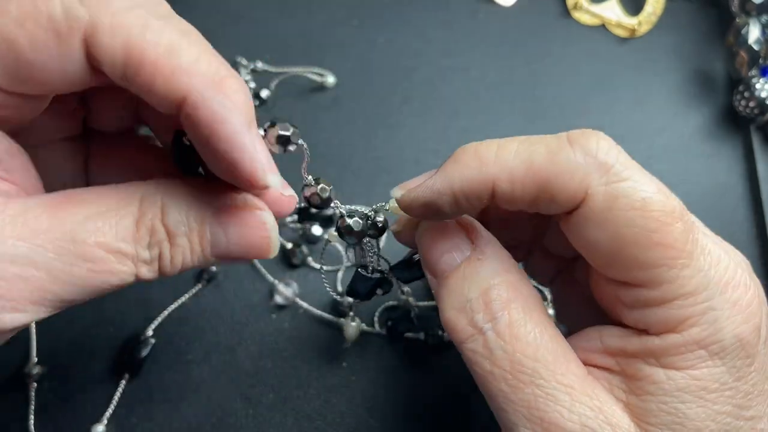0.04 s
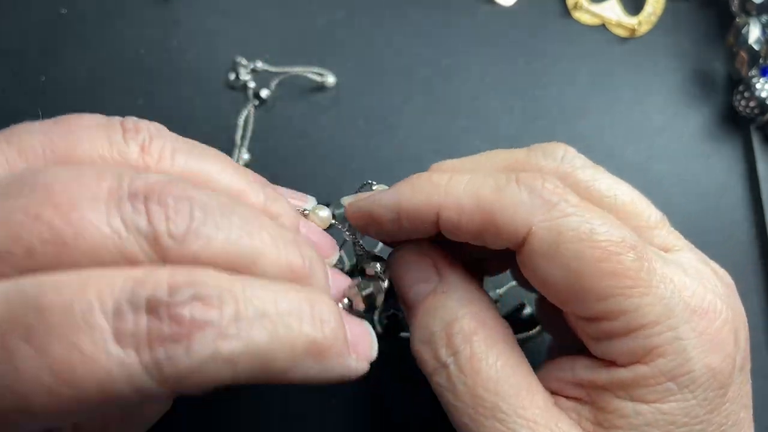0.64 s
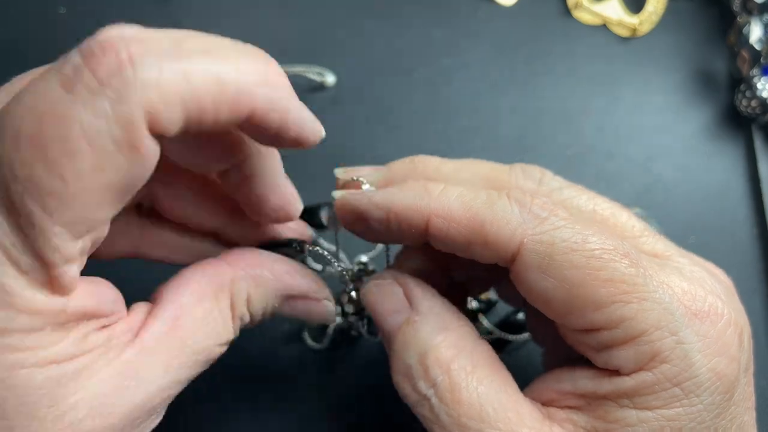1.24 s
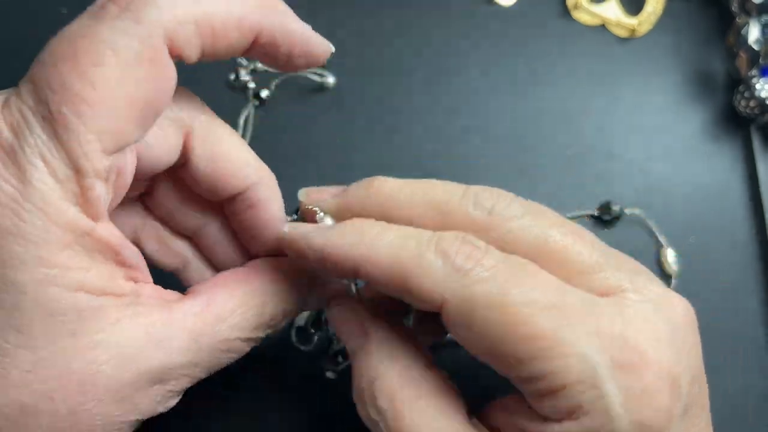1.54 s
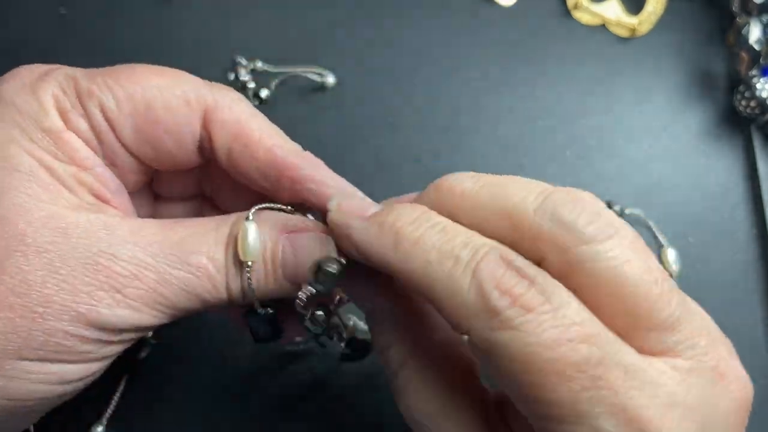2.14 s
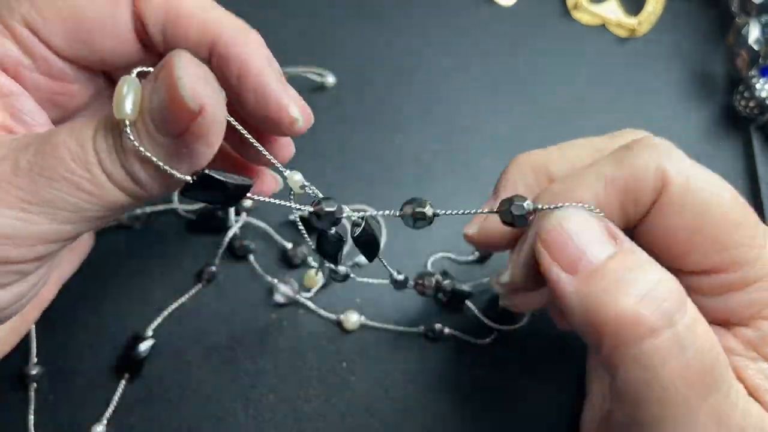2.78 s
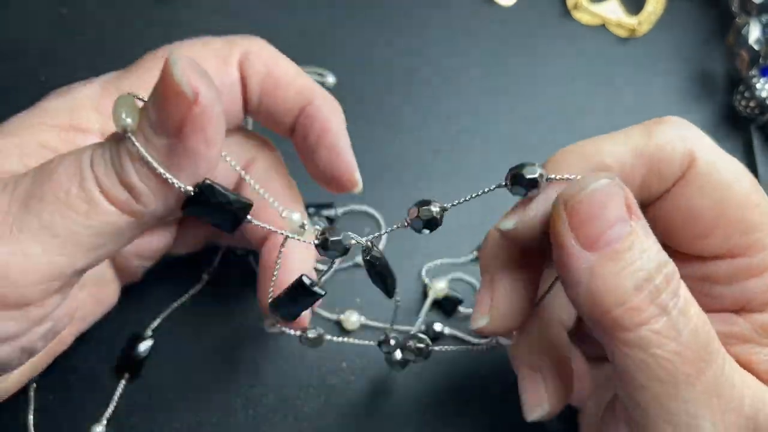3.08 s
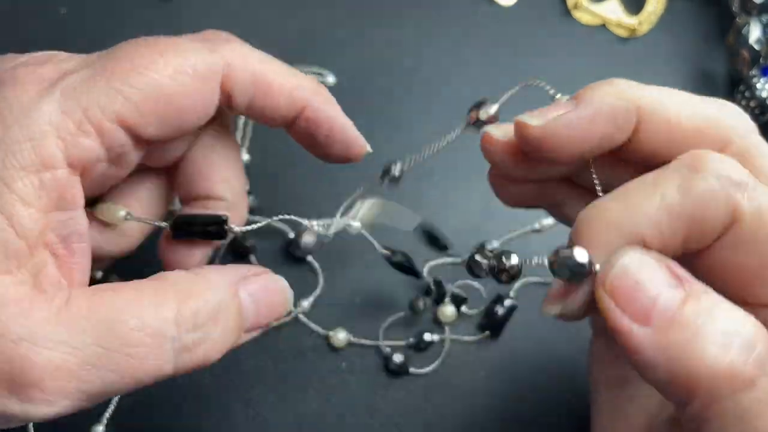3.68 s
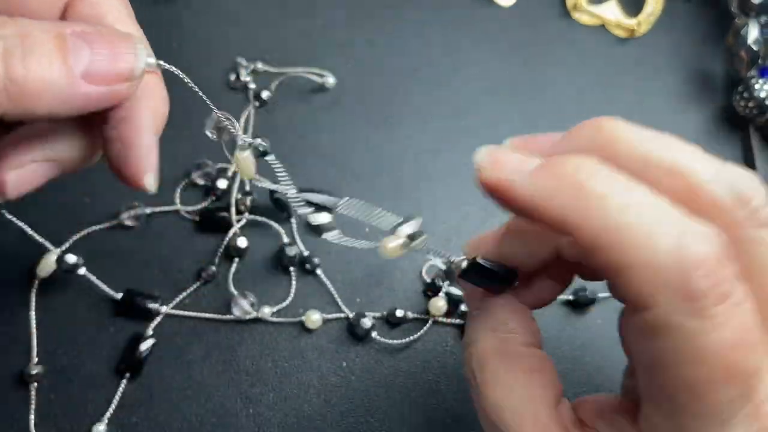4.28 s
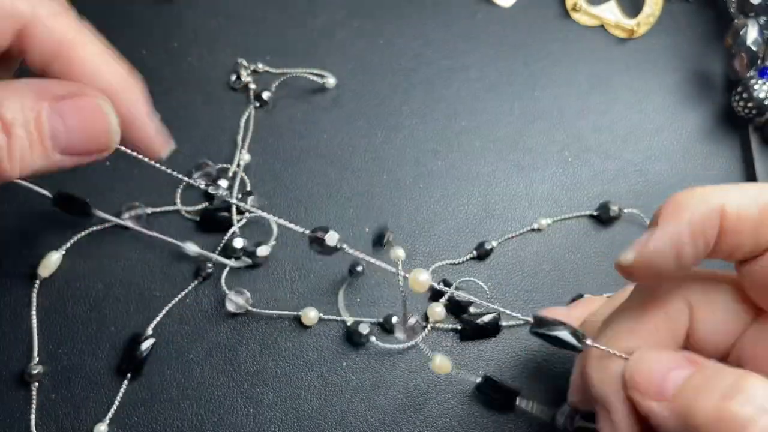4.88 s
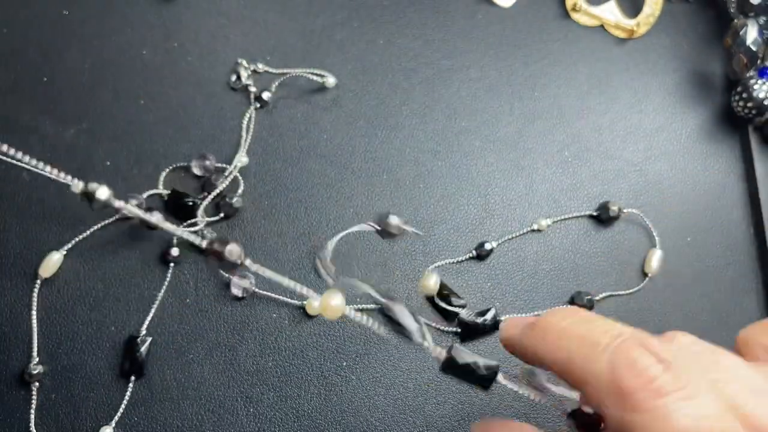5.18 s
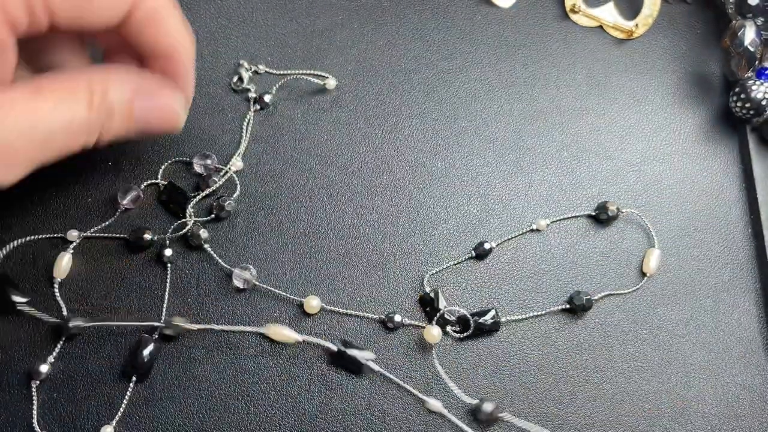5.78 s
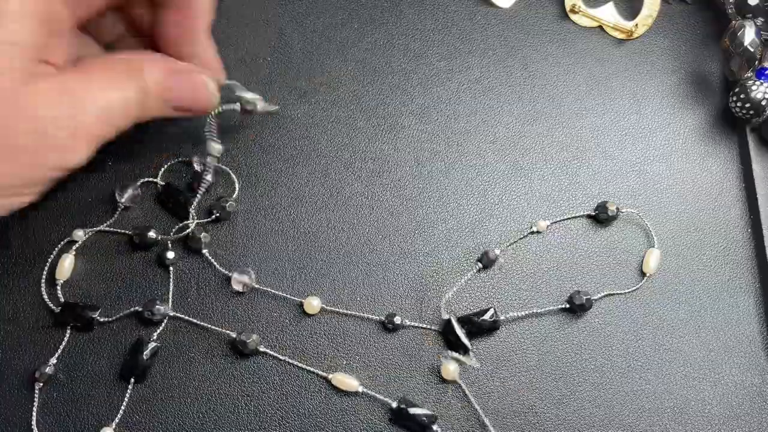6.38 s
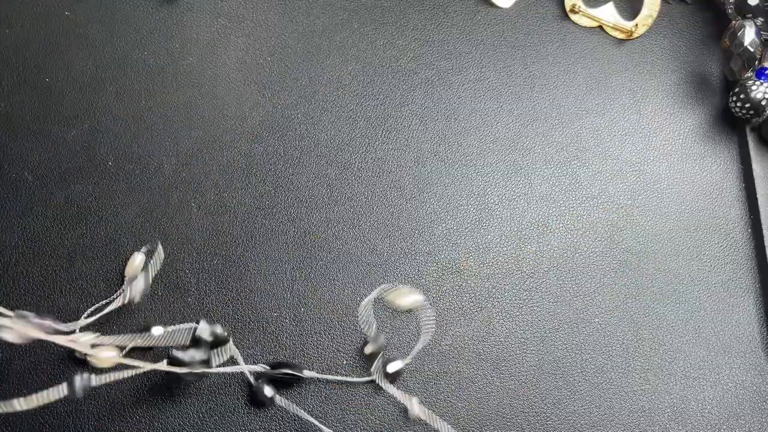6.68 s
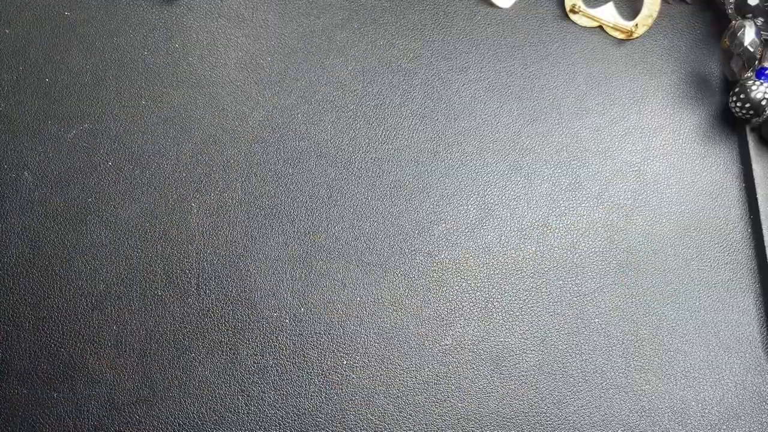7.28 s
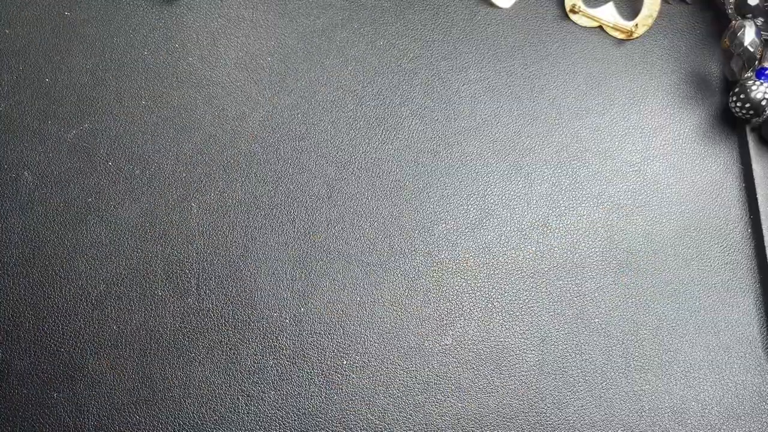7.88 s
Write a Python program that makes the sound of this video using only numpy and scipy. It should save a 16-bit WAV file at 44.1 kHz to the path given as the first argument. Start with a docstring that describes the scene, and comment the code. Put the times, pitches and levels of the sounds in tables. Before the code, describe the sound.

Faint rustling and ticking of a fine chain and glass beads being untangled by hand, then dragged rattling across a padded desk.

```python
"""A tangled necklace of fine chain and glass beads is worked loose over a padded desk, then dragged off it.
At first the links rustle by friction and beads tick against each other or knock on the pad. From about
3.4 s harder impacts excite the modes of the desk, and from 4.6 s a fingertip bumps down now and then.
Near 6.7 s the drag sets the beads rattling; a few last clinks follow. Throughout, a close microphone
with two ports hears the small, quiet room and its mains hum."""
import sys
import numpy as np
from scipy import signal
from scipy.fft import rfft, irfft, next_fast_len
from scipy.io import wavfile

SR = 44100
rng = np.random.default_rng(int(sys.argv[2]) if len(sys.argv) > 2 else 0)


def dump_mix(stems):
    """Bounce the given channels to the path in sys.argv[1] as a 16-bit WAV at rate SR."""
    frames = np.atleast_2d(stems).T  # one column per channel
    limited = np.clip(frames, -1, 1)  # hard clip at full scale
    pcm = np.round(limited * 32767).astype(np.int16)
    wavfile.write(sys.argv[1], SR, pcm)


N = 358709
TIME = np.arange(N) / SR


# bead meets bead in the air: t/s, relative tick level/dB
BEAD_CLINKS = [(0.1603, -45.5), (0.442, -51), (0.4792, -49.5), (.8131, -57), (1.0128, -51), (1.969, -48.5),
               (2.2559, -48), (3.0391, -45.5), (3.42, -40), (3.6337, -34.5), (4.156, -28), (4.2561, -53),
               (4.2675, -34.5), (4.3032, -37.5), (4.6056, -33), (4.8885, -38.5), (5.0607, -39.5),
               (5.321, -48), (5.5712, -47), (6.6827, -29), (6.6965, -30), (6.7416, -34.5), (6.755, -33),
               (6.8335, -48.5), (6.8622, -33), (6.8814, -33.5), (6.9391, -34.5), (6.968, -30.5),
               (7.0096, -33.5), (7.4804, -47), (7.5888, -29), (7.6953, -42.5), (7.715, -36), (7.7356, -34),
               (7.8112, -43.5)]

def clinks():
    """Hard impact: glass on glass ticks and passes little of its energy to pad and desk."""
    return [(s, db, db - 32, db - 39) for s, db in BEAD_CLINKS]


# bead meets pad: t/s, relative knock level/dB
PAD_KNOCKS = [(0.896, -63.5), (1.1785, -60), (1.6962, -57), (2.211, -44.5), (2.5925, -63.5), (3.46, -46.5),
              (3.4695, -54), (3.5222, -44.5), (3.6036, -46), (3.72, -34), (3.7361, -40.5), (4.202, -48),
              (4.3503, -57), (4.596, -46.5), (4.618, -42), (4.638, -40), (4.7491, -51), (4.8571, -44.5),
              (4.9066, -40.5), (4.9366, -47), (4.97, -46.5), (5.2544, -33), (5.4324, -49), (5.512, -42.5),
              (5.7331, -28.5), (5.7845, -40), (6.1654, -39.5), (6.7632, -33), (7.37, -59.5)]

def pad_knocks():
    """Cushioned impact: the soft pad favours the lower knock over the glassy tick."""
    return [(s, db - 10.5, db, db - 35) for s, db in PAD_KNOCKS]


# a string of beads falls: t/s, relative knock level/dB, relative tick level/dB
BEAD_DROPS = [(2.2018, -55, -46), (3.4041, -44, -48), (3.5515, -42.5, -55), (3.7468, -46.5, -57),
              (3.9749, -48.5, -72), (4.1705, -52, -48), (4.4139, -49, -42), (4.648, -34, -29.5),
              (4.898, -47.5, -56), (5.53, -44.5, -57), (5.6006, -42.5, -54), (5.6498, -37.5, -54),
              (5.7157, -30.5, -45), (5.8914, -40.5, -39.5), (5.9524, -32.5, -34), (6.169, -34, -32),
              (6.4724, -38.5, -34), (6.538, -41, -36), (6.669, -28.5, -43), (6.7839, -24, -35),
              (6.8003, -34, -29.5), (6.9725, -34.5, -30), (7.047, -44, -40.5), (7.1509, -49.5, -45),
              (7.1965, -36, -34.5)]

def drops(bounce_s=0.0062, loss_db=12.5):
    """Inelastic rebound: each fall is hard enough to sound the desk and bounces once, more weakly."""
    falls = np.array([(s, tick_db, db, db - 11) for s, db, tick_db in BEAD_DROPS])
    bounces = np.column_stack([falls[:, 0] + bounce_s, falls[:, 1:] - loss_db])
    return np.vstack([falls, bounces])


DRAG_START_S, DRAG_END_S = 6.68, 7.06
# mean hop of a dragged bead: relative level/dB of tick, knock and desk
HOP_LEVELS = (-46, -47.5, -51)

def rattles(per_s=32, spread_db=3.5):
    """Intermittent contact: dragged beads hop at uneven intervals, each hop with a force of its own."""
    s = np.arange(DRAG_START_S, DRAG_END_S, 1 / per_s)
    chance_db = spread_db * rng.standard_normal((len(s), len(HOP_LEVELS)))
    jitter_s = rng.uniform(-0.38, .5, len(s)) / per_s
    return np.column_stack([s + jitter_s, HOP_LEVELS + chance_db])


# spectra of glass on glass, glass on the pad and the struck desk: f/Hz, relative level/dB
TICK_SPECTRUM = [(500, -83), (2300, -22.5), (4200, -28), (5200, -18), (7000, -9.5), (8500, -6.5),
                 (10000, 3), (10900, 6), (12000, -7.5), (13200, -17), (15500, -30)]
KNOCK_SPECTRUM = [(200, -49.5), (1000, -41.5), (1500, -21), (2350, -9), (2900, -13), (3600, -9.5),
                  (4150, 4.5), (4800, -7.5), (6000, -11.5), (8000, -17), (11000, -28.5), (14000, -64.5)]
DESK_SPECTRUM = [(50, -21), (260, -8.5), (520, -13), (740, -7), (1100, -2), (2200, -1.5), (3100, -3.5),
                 (4000, -4.5), (5000, 0.5), (7000, -5.5), (10600, -3), (13000, -25.5), (16000, -36.5)]

def beads():
    """Superposition: each contact excites a tick, a knock and the desk, in shares set by its kind."""
    contacts = np.vstack([clinks(), pad_knocks(), drops(), rattles()])
    s, tick_db, knock_db, desk_db = contacts.T
    ticks = impacts(s, tick_db, TICK_SPECTRUM, (9000, 13000), .004, t60=0.015, snap=1.4, apart=0.037)
    knocks = impacts(s, knock_db, KNOCK_SPECTRUM, (3000, 5200), .004, t60=0.015, snap=2.1, apart=0.44)
    desk = impacts(s, desk_db, DESK_SPECTRUM, (400, 1600), .01, t60=0.14, snap=8.0, apart=0.33)
    ringing = signal.fftconvolve(desk.mean(axis=0), desk_ring())[:N]
    return from_db(3.5) * ticks + from_db(1.94) * knocks + from_db(-6.5) * desk + from_db(-54.5) * ringing


def impacts(times, levels_db, spectrum, band_hz, span_s, t60, snap, apart, detune=.045, size=6144):
    """Source and filter: a snap and a dying chatter drive the spectrum of the struck body."""
    t = np.arange(size) / SR
    noise = rng.standard_normal((len(times), 3, size))
    force = (noise[:, :1] + apart * noise[:, 1:]) * from_db(-60 * t / t60)   # partly unlike at each port
    force[..., 0] += snap
    pitches = np.exp(detune * rng.uniform(-1.22, 1, len(times)))   # no two beads ring quite alike
    bodies = np.array([response([(hz * pitch, db) for hz, db in spectrum], 1024) for pitch in pitches])
    sounds = signal.fftconvolve(force, bodies[:, None], axes=2)
    # each level is the rms within band_hz over the first span_s
    bandpass = signal.butter(2, band_hz, "band", fs=SR, output="sos")
    onsets = signal.sosfilt(bandpass, sounds[..., :int(span_s * SR)])
    gains = from_db(levels_db) / np.sqrt(np.mean(onsets ** 2, axis=(1, 2)))
    track = np.zeros((2, N))
    for s, gain, sound in zip(times, gains, sounds):
        add(track, s, gain * sound)
    return track


# modes of the desk top: f/Hz, relative level/dB, T60/s
DESK_TOP_MODES = [(71, -5, 0.14), (106.4, -8.5, 0.2), (155, -1.5, 0.081), (274, -4, 0.083),
                  (383, -6.5, 0.05), (714, 6.5, 0.052), (913, 0.5, 0.043), (1030, -1, 0.08)]

def desk_ring(late_cycles=1.62):
    """Modal impulse response: bending waves are dispersive, so the low modes arrive last."""
    ring = 0
    for hz, db, t60 in DESK_TOP_MODES:
        age = np.maximum(TIME[:SR // 2] - late_cycles / hz, 0)
        ring = ring + from_db(db - 60 * age / t60) * np.sin(2 * np.pi * hz * age)
    return ring


PULL_ATTACK_S = 0.022
# constant stirring of the held chain: t/s, relative jingle level/dB, relative slide level/dB
CHAIN_STIR = [(0.0, -84, -99), (1.33, -89.5, -95), (2.01, -63.5, -87), (2.99, -83, -87.5),
              (3.6, -63.5, -63), (3.89, -74.5, -68), (4.46, -66.5, -77), (5.02, -59.5, -58),
              (5.5, -61, -64.5), (5.73, -73, -55), (6.25, -74, -61), (6.7, -54, -38), (6.86, -50, -58.5),
              (7.27, -66, -70), (7.72, -63.5, -87.5), (8.13, -91.5, -97)]
# pulls by hand: t/s, duration/s, relative jingle level/dB, relative slide level/dB
CHAIN_PULLS = [(0.174, 0.059, -65.5, -89), (0.404, 0.063, -63, -75.5), (0.732, 0.69, -74, -88),
               (1.279, 0.11, -72.5, -71), (1.593, 0.11, -70.5, -66.5), (1.785, 0.53, -71.5, -65),
               (2.34, 0.43, -107, -74.5), (2.704, 0.047, -69, -83.5), (3.024, 0.047, -66.5, -63),
               (3.182, 0.13, -70, -65.5), (3.4, 0.21, -79.5, -56), (3.722, 0.097, -80, -50.5),
               (4.085, .27, -66.5, -70.5), (4.842, 0.14, -71.5, -54.5), (5.001, 0.15, -52.5, -63.5),
               (5.477, 0.15, -60.5, -65), (5.713, .13, -60.5, -43), (5.86, 0.23, -63, -66.5),
               (6.398, 0.15, -55, -46), (6.644, 0.22, -45.5, -38), (6.883, .17, -49, -49),
               (7.087, 0.071, -50.5, -60.5), (7.54, 0.27, -57.5, -74.5), (7.98, 0.03, -61.5, -84)]

def chain_levels(release_db_per_s=236.5):
    """Incoherent sources add in power: each pull swells, holds and dies away over the stirring."""
    s, *columns = np.transpose(CHAIN_STIR)
    power = from_db([np.interp(TIME, s, column) for column in columns]) ** 2
    for start, length, *levels_db in CHAIN_PULLS:
        swell = np.clip((TIME - start) / PULL_ATTACK_S, 0, 1)
        release = from_db(-release_db_per_s * np.clip(TIME - start - length, 0, 1))
        power = power + np.outer(from_db(levels_db), swell * release) ** 2
    return 10 * np.log10(power)


# spectra of jingling links and of chain sliding on the pad: f/Hz, relative level/dB
LINK_SPECTRUM = [(1500, -40), (4200, -20), (6500, -15.5), (8800, -8.5), (10000, -2), (10800, 0),
                 (12000, -19.5), (13200, -42), (16000, -35.5)]
SLIDE_SPECTRUM = [(100, -29), (800, -26), (2300, -12), (3200, -11.5), (3800, -3.5), (4250, 0.5), (4800, -7),
                  (6300, -17), (8500, -21), (13000, -52)]

def chain():
    """Collision and friction: links jingle as the chain bends and rasp where it slides."""
    links_db, slide_db = chain_levels()
    links = stick_slip(links_db, LINK_SPECTRUM, per_s=560, spread_db=5.5, hiss=0.43, t60=0.01)
    slide = stick_slip(slide_db, SLIDE_SPECTRUM, per_s=550, spread_db=2.5, hiss=0.31, t60=0.0088)
    return from_db(5.0) * links + from_db(-4.0) * slide


def stick_slip(level_db, spectrum, per_s, spread_db, hiss, t60, stretches=5):
    """Stick-slip friction: stretches of chain catch and slip independently, each with a short ring."""
    t = TIME[:SR // 50]
    rustle = 0
    for _ in range(stretches):
        ring = rms_one(rng.standard_normal(len(t)) * from_db(-60 * t / t60))
        slipping = from_db(3.5 * drift(45))
        force = slipping * link_collisions(level_db, per_s / stretches, spread_db, hiss)
        rustle = rustle + signal.oaconvolve(force, ring)[:N]
    return from_db(level_db) * coloured(rustle, spectrum)


def link_collisions(level_db, per_s, spread_db, hiss):
    """Shot noise over friction hiss: separate ticks in slow handling merge into a zip in a fast pull."""
    rate = per_s * from_db(.6 * (level_db + 60))   # equals per_s at -60 dB
    sizes = from_db(spread_db * np.minimum(rng.exponential(1, N), 4.5)) * rng.choice([-1, 1], N)
    collides = rng.random(N) < rate / SR
    return rms_one(sizes) * collides * np.sqrt(SR / rate) + hiss * rng.standard_normal(N)


# hollow resonance of the desk: f/Hz, relative level/dB
HOLLOW_SPECTRUM = [(60, -20.5), (200, -8.5), (300, -14), (480, -14.5), (620, -4), (712, 2), (830, 2.5),
                   (1050, -15.5), (1600, -14)]

def drag(hollow_db=-55, release_db_per_s=128.5):
    """Forced vibration: beads scraping over the desk drive its hollow resonance."""
    swell = np.clip((TIME - DRAG_START_S) / PULL_ATTACK_S, 0, 1)
    level_db = hollow_db - release_db_per_s * np.maximum(TIME - DRAG_END_S, 0)
    return swell * stick_slip(level_db, HOLLOW_SPECTRUM, per_s=900, spread_db=2.5, hiss=.5, t60=.008)


# a fingertip lands on the desk: t/s, impulse level/dB
FINGER_BUMPS = [(4.648, -56.5), (5.955, -50), (6.162, -40), (6.788, -53)]
# skin brushes as the hands shift: centre t/s, Gaussian width/s, level/dB
SKIN_BRUSHES = [(.14, 0.12, -77.5), (2.1, 0.18, -80.5), (2.77, 0.1, -72.5), (5.15, 0.6, -86.5)]
# spectrum of brushing skin: f/Hz, relative level/dB
SKIN_SPECTRUM = [(60, -19), (150, -3.5), (300, 0), (600, -23.5), (1500, -24), (12000, -58.5)]

def hands(soft_hz=326):
    """Soft contact acts as a low-pass: fingertips ring mainly the low desk modes; skin brushes dully."""
    push = np.zeros(N)
    for s, db in FINGER_BUMPS:
        add(push, s, from_db([db]))
    thud = signal.sosfilt(signal.butter(2, soft_hz, fs=SR, output="sos"), desk_ring())
    brushing = sum(from_db(db) * np.exp(-.5 * ((TIME - s) / width) ** 2) for s, width, db in SKIN_BRUSHES)
    return signal.fftconvolve(push, thud)[:N] + brushing * coloured(rng.standard_normal(N), SKIN_SPECTRUM)


def room(x, t60=0.25, build_s=0.00043, wet_db=-14, dull_hz=6500):
    """Diffuse reverberation: a dull tail, different at each port, builds fast and decays exponentially."""
    t = TIME[:SR // 2]
    tails = rng.standard_normal((2, len(t))) * from_db(-60 * t / t60) * (1 - np.exp(-t / build_s))
    tails /= np.sqrt(np.sum(tails ** 2, axis=1, keepdims=True))
    tails = signal.sosfilt(signal.butter(1, dull_hz, fs=SR, output="sos"), tails)
    return from_db(wet_db) * signal.fftconvolve(x, tails, axes=1)[:, :N]


# spectrum of the room's rumble: f/Hz, relative level/dB
AIR_SPECTRUM = [(20, -13), (40, -4), (75, 2), (130, -2.5), (250, -13), (500, -21.5), (1000, -28.5),
                (2500, -31), (4100, -35), (6000, -37), (10500, -40.5), (13000, -46.5), (16000, -57.5)]

def background(air_db=-72.5, hum_db=-73.5, hum_hz=59.3):
    """Ambient noise, coherent between the ports only in the bass, and a slightly wavering mains hum."""
    common = coloured(rng.standard_normal(N), AIR_SPECTRUM)
    side = coloured(rng.standard_normal(N), AIR_SPECTRUM)
    side = signal.sosfilt(signal.butter(2, 200, "high", fs=SR, output="sos"), side)
    hum = np.sqrt(2) * np.sin(2 * np.pi * hum_hz * TIME + .4 * drift(5)) * from_db(1.8 * drift(8))
    return from_db(air_db) * (common + side * [[1], [-1]]) + from_db(hum_db) * hum


def from_db(db):
    """Amplitude ratio of a level."""
    return 10 ** (np.asarray(db) / 20)


def rms_one(x):
    """Normalisation to unit rms."""
    return x / np.sqrt(np.mean(x ** 2) + 1e-20)


def response(spectrum, size):
    """Minimum-phase impulse response of a spectrum, by folding the cepstrum."""
    hz, db = np.transpose(spectrum)
    grid = np.maximum(np.fft.rfftfreq(size, 1 / SR), 1)
    magnitude = from_db(np.interp(np.log(grid), np.log(hz), db))
    cepstrum = irfft(np.log(magnitude))
    cepstrum[1:size // 2] *= 2
    cepstrum[size // 2 + 1:] = 0
    return irfft(np.exp(rfft(cepstrum)))


def coloured(x, spectrum):
    """Spectral shaping by convolution, at unit rms."""
    return rms_one(signal.fftconvolve(x, response(spectrum, 8192))[:N])


def drift(per_s):
    """Slow random fluctuation of unit rms."""
    knots = rng.standard_normal(int(N / SR * per_s) + 2)
    return rms_one(np.interp(TIME * per_s, np.arange(len(knots)), knots))


def add(track, s, sound):
    """Superposes a sound on a track at time s."""
    start = max(int(s * SR), 0)
    track[..., start:start + sound.shape[-1]] += sound[..., :max(N - start, 0)]


def scene():
    """Direct and reverberant sound of the necklace add to the hands and the ambient noise."""
    necklace = beads() + chain() + drag()
    return necklace + room(necklace) + hands() + background()


# lag of the right port behind the left: f/Hz, phase/rad
RIGHT_PORT_LAG = [(0, 0), (1700, 0), (2900, .8), (3800, .7), (4500, 1.6), (4900, 3.1), (5200, 4.9),
                  (5900, 6.3), (7500, 8.0), (11000, 11.0), (12300, 12.3), (13500, 12.8), (15500, 15.7)]

def record(dry, cutoff_hz=16400):
    """Phase delay and band limiting: the right port hears the treble late; a low-pass cuts the top."""
    size = next_fast_len(N + SR // 10)
    lag = np.interp(np.fft.rfftfreq(size, 1 / SR), *np.transpose(RIGHT_PORT_LAG))
    right = irfft(rfft(dry[1], size) * np.exp(-1j * lag), size)[:N]
    lowpass = signal.ellip(10, .2, 80, cutoff_hz, fs=SR, output="sos")
    return signal.sosfilt(lowpass, np.array([dry[0], right]))


dry = scene()
out = record(dry)
dump_mix(out)
```